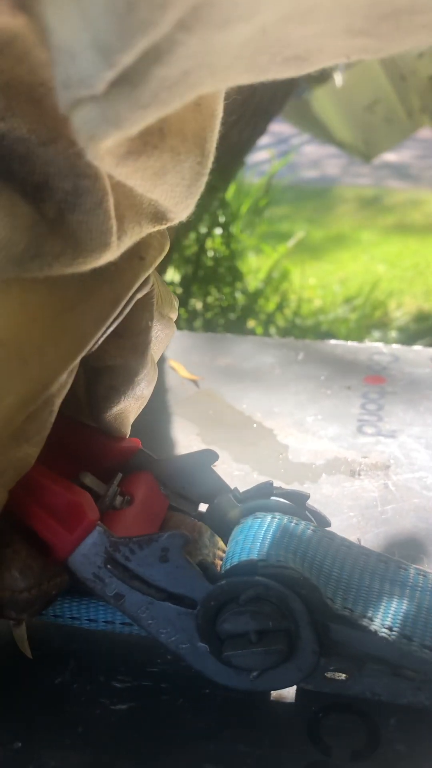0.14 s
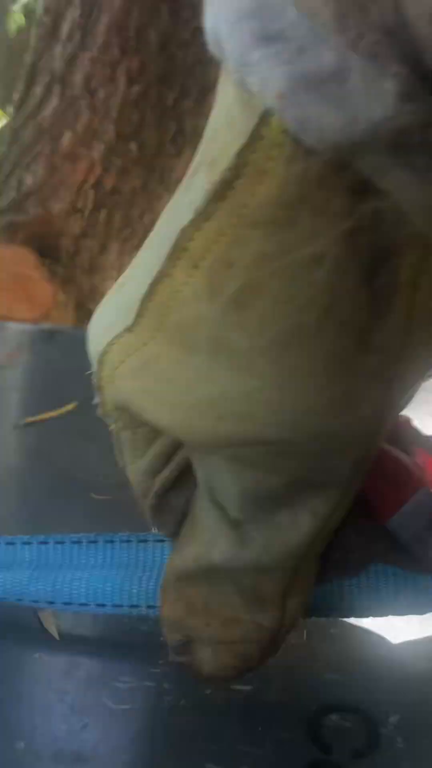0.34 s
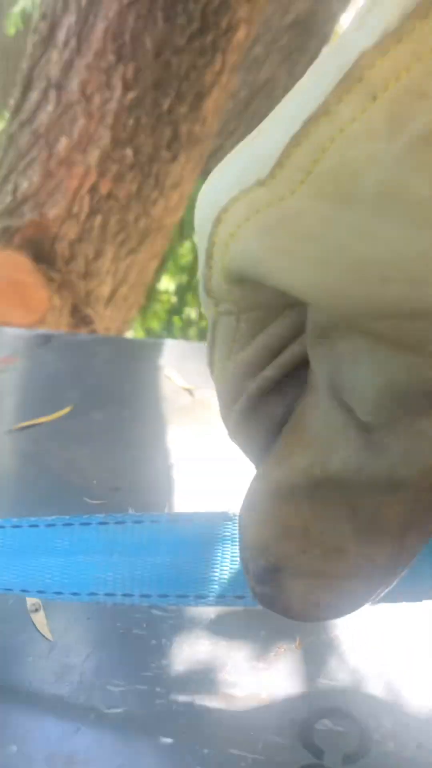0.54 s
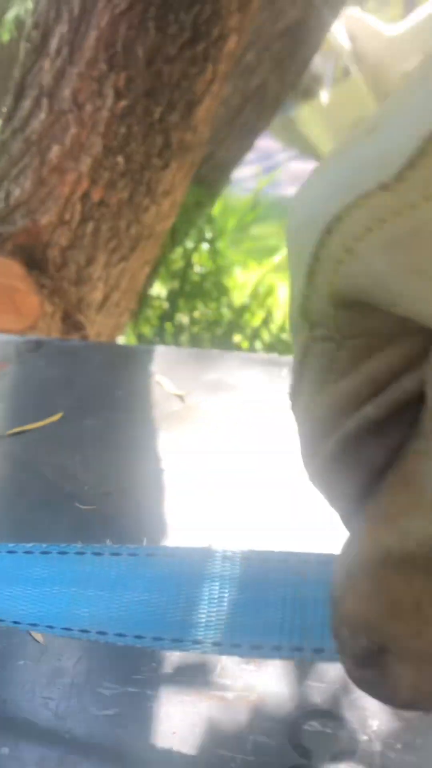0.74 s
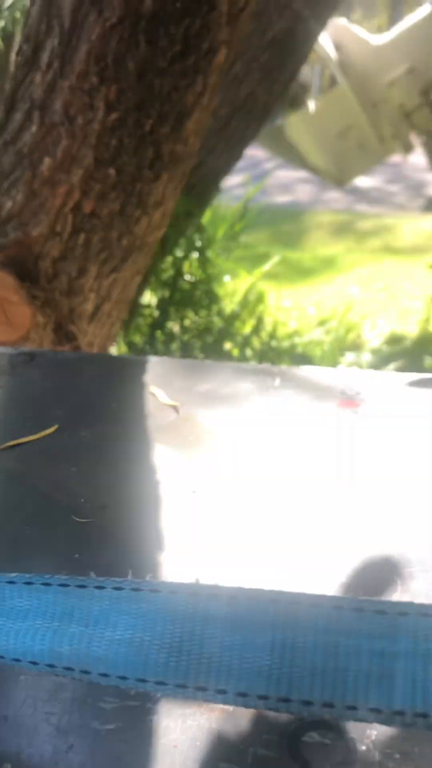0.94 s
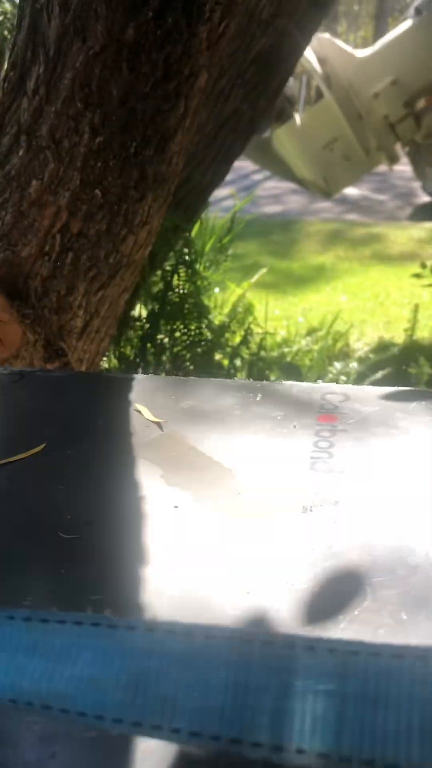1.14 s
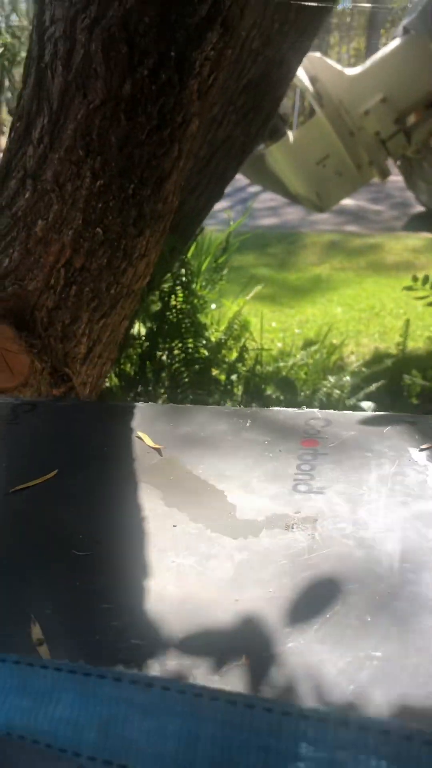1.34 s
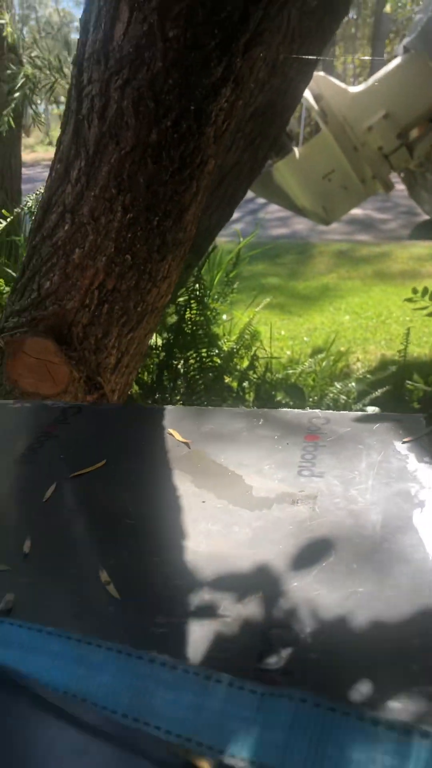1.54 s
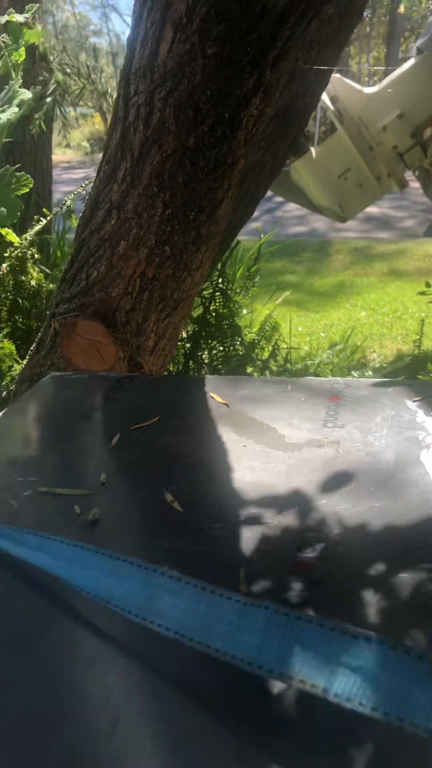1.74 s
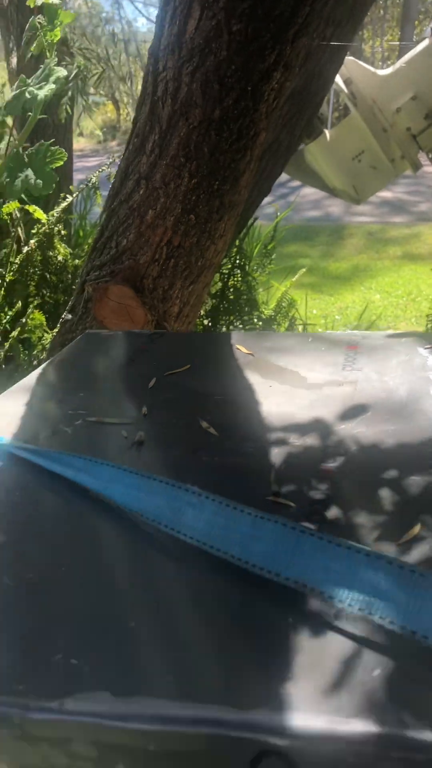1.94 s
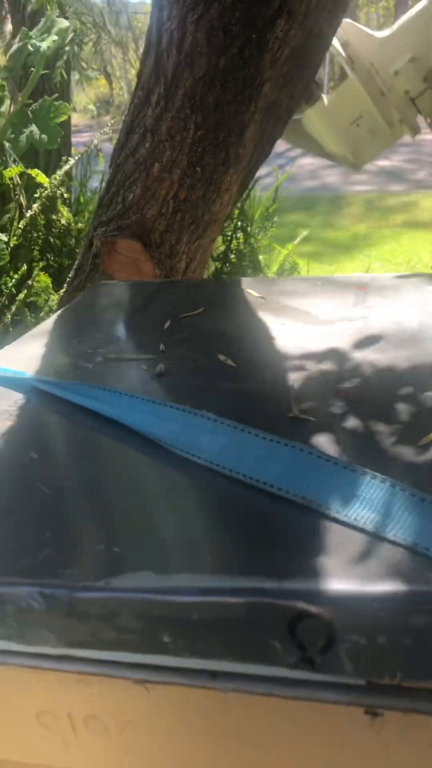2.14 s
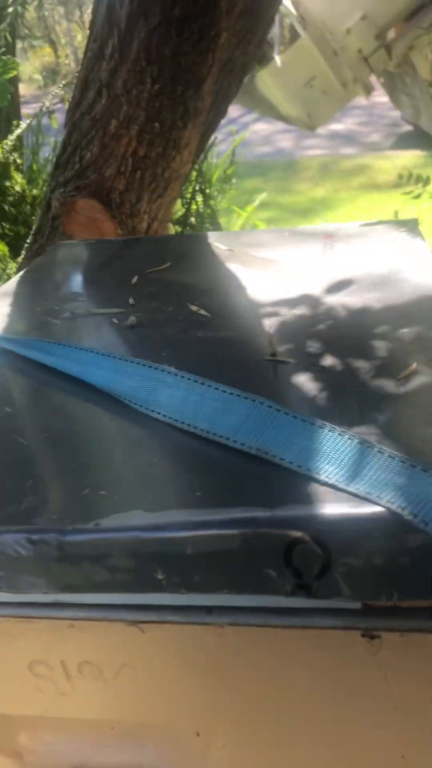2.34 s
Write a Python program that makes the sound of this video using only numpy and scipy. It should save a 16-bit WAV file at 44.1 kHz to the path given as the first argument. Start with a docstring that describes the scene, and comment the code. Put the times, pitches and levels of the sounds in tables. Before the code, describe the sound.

A metal ratchet strap buckle snaps open with a sharp double clack, faint birds whistling afterwards outdoors

```python
"""A steel ratchet buckle on a tight cargo strap is released outdoors, close to the microphone.
The spool spins free and rattles past its pawl, in bright noise snaps, mid-range clacks and steel ring.
The buckle slams onto the load's hollow panel: cracking noise and damped modes, with dull gliding thuds.
Shaped noise makes the glove and sleeve, which rustle away afterwards.
Birds, arched whistles with an octave, call in the trees over a low rumble of noise and faint hum."""
import sys
import numpy as np
from scipy import signal
from scipy.fft import rfft, irfft, next_fast_len
from scipy.io import wavfile
from scipy.ndimage import map_coordinates

SR = 44100
rng = np.random.default_rng(int(sys.argv[2]) if len(sys.argv) > 2 else 0)


def output_pcm(signal):
    """Save a mono or channel-first signal as 16-bit PCM at the path in sys.argv[1].

    Samples are clipped to [-1, 1] before scaling.
    """
    pcm = np.clip(np.atleast_2d(signal).T, -1, 1) * 32767
    wavfile.write(sys.argv[1], SR, np.round(pcm).astype(np.int16))


N = 105840
T = np.arange(N) / SR  # s


def amp(db):
    """Decibels to gain."""
    return 10 ** (np.asarray(db) / 20)


def unit(x):
    """Scale to rms 1."""
    return x / np.sqrt(np.mean(x ** 2) + 1e-20)


def along(points, hz):
    """Read a curve of (f/Hz, value) points on a log frequency axis."""
    f, v = np.transpose(points)
    return np.interp(np.log(hz + 1), np.log(f + 1), v)


def fade(t, t60):
    """Exponential decay by 60 dB in t60 seconds."""
    return np.exp(-np.log(1000) * t / t60)


def noise(colour, size=N):
    """Noise of rms 1, its spectrum shaped by (f/Hz, level/dB) points."""
    spectrum = rfft(rng.standard_normal(size))
    gain = amp(along(colour, np.fft.rfftfreq(size, 1 / SR)))
    return unit(irfft(spectrum * gain, size))


def wobble(rate):
    """A smooth random curve, rate knots a second."""
    knots = rng.standard_normal(4096)
    return map_coordinates(knots, [T * rate], mode="wrap")


def ring(modes, t, t60, scatter_db):
    """Damped modes, struck a little differently each time; t60 is a function of frequency."""
    out = np.zeros(len(t))
    for hz, db in modes:
        level = amp(db + scatter_db * rng.normal()) * fade(t, t60(hz))
        out += level * np.sin(2 * np.pi * (hz * t + rng.random()))
    return out


def add(out, s, x):
    """Mix x in at time s."""
    i = max(0, round(s * SR))
    out[i:i + len(x)] += x[:N - i]


def echo(x, t60):
    """Diffuse outdoor reflections: a decaying noise tail that builds up over some 15 ms."""
    t = T[:SR]
    tail = rng.standard_normal(SR) * fade(t, t60) * (1 - np.exp(-t / 0.015))
    return signal.fftconvolve(x, tail / np.linalg.norm(tail))[:N]


def ratchet():
    """Each contact is a bright snap, a mid-range clack, a faint chatter and a short steel ring."""
    # steel-on-steel contacts of pawl and spool: [t/s, relative level/dB, weight of frame's clack/dB]
    contacts = [(0.2022, -7.5, -10.5), (0.204, -7.5, -1.5), (.2052, -19, -2), (0.2114, -13.5, -22),
                (0.2104, -35, -11.5), (.2160, -29.5, -6), (0.2181, 0, -13.5), (0.2182, -11, -17),
                (0.2189, -17, -26.5), (.2233, -10, -12.5), (0.2294, -26.5, -3.5), (0.2317, -11.5, -4),
                (.2335, -22, 0), (0.2396, -8.5, -12), (0.2414, -28, -17), (0.2508, -28.5, -4),
                (0.2617, -20, -4.5), (0.2648, -15, -15), (0.2679, -16.5, -5.5), (0.2683, -16.5, -12),
                (0.272, -33.5, -18), (0.2815, -27.5, 4.5), (0.3192, -15.5, -2), (0.3599, -29.5, -10),
                (.3641, -35, 3), (.3690, -43, -17)]
    # ring of the buckle's steel: [f/Hz, relative level/dB]
    steel_modes = [(2250, -13), (4414, -18.5), (5255, -2.5), (6600, -7), (7796, -3), (8398, -5.5),
                   (8762, -6), (8864, -5), (9000, -4.5), (9250, -5), (9704, -0.5), (12050, 0), (13080, -4)]
    # spectrum of snap and chatter: [f/Hz, relative level/dB]
    snap_colour = [(300, -17), (3000, -19.5), (5200, -1), (7200, -8.5), (8800, 1.5), (10300, -5),
                   (13000, -1), (15500, -6)]
    # spectrum of the frame's clack: [f/Hz, relative level/dB]
    clack_colour = [(100, -19.5), (200, 6.5), (500, 0.5), (900, -1), (1550, -12.5), (2200, 1.5), (3100, -7),
                    (4600, -2), (6000, -4.5), (15000, -25)]
    snap_t60, chatter_t60, clack_t60, clack_tail_t60, steel_t60 = 0.0081, 0.083, 0.0095, 0.14, 0.09  # s
    snap_db, chatter_db, clack_tail_db, steel_db = 2, -24, -18, -30  # relative to the contact
    out, t = np.zeros(N), T[:SR // 4]
    for s, db, clack_db in contacts:
        snap_level = amp(snap_db) * fade(t, snap_t60) + amp(chatter_db) * fade(t, chatter_t60)
        snap = noise(snap_colour, size=len(t)) * snap_level
        clack_level = .5 * fade(t, clack_t60) + amp(clack_tail_db) * fade(t, clack_tail_t60)
        clack = amp(clack_db) * noise(clack_colour, size=len(t)) * clack_level
        steel = amp(steel_db) * ring(steel_modes, t, lambda hz: steel_t60, scatter_db=1.5)
        add(out, s, amp(db) * (snap + clack + steel))
    return out


def panel():
    """A blow cracks, dulls as its treble dies and rings the panel."""
    # blows of the buckle on the panel: [t/s, knock level/dB, panel ring level/dB]
    blows = [(.3143, -7.5, -27.5), (.3295, -25.5, -31.5)]
    # ring of the hollow panel: [f/Hz, relative level/dB]
    panel_modes = [(185, -8), (310, -6.5), (490, -2), (670, -0.5), (851, -10), (1000, 1), (1240, 2.5),
                   (1430, -22), (1663, -3), (1850, -13), (2065, 5), (2362, -3), (2530, 8.5)]
    # spectrum of a knock: [f/Hz, relative level/dB]
    knock_colour = [(60, -25), (150, 3), (300, -9.5), (700, -2.5), (1100, -4.5), (1650, -0.5), (2300, -1),
                    (3000, -2), (4500, -5), (5700, -11), (6850, -2.5), (8400, -19), (15500, -17)]
    # decay of a knock: [f/Hz, t60/s]
    knock_t60 = [(100, 0.099), (600, 0.19), (1500, 0.088), (3500, 0.053), (14000, 0.013)]
    crack_t60, crack_db = .008, 4  # s; dB over the body of the knock
    ring_t60, damping = .105, .6  # s at 1 kHz; power by which it shortens with frequency
    out, t = np.zeros(N), T[:SR // 2]
    for s, knock_db, ring_db in blows:
        hz, age, z = signal.stft(noise(knock_colour, size=len(t)), SR, nperseg=256)
        z = z * fade(age, along(knock_t60, hz)[:, None])
        knock = signal.istft(z, SR, nperseg=256)[1][:len(t)]
        knock *= .5 * (1 + amp(crack_db) * fade(t, crack_t60))
        modes = ring(panel_modes, t, lambda f: ring_t60 * (f / 1000) ** -damping, scatter_db=-0.5)
        modes *= 1 - np.exp(-t / 0.00086)  # soft onset
        add(out, s, amp(knock_db) * knock + amp(ring_db) * modes)
    return out


def thuds():
    """Soft low pushes of strap and hollow panel, whose pitch settles as the tension lets go."""
    # dull thuds: [t/s, level/dB, settled f/Hz, t60/s]
    pushes = [(0.202, -19.5, 180, 0.09), (0.22, -26.5, 79.2, 0.1), (0.248, -34, 276, 0.12),
              (0.269, -30.5, 226, 0.19), (0.3129, -18.5, 237, 0.065), (0.3277, -13, 121.2, 0.1),
              (0.424, -34.5, 207, 0.1)]
    rise_s, settle_s = 0.0054, .012
    sag = 0.11  # fraction by which the pitch starts high
    out, t = np.zeros(N), T[:SR // 2]
    for s, db, hz, t60 in pushes:
        pitch = hz * (1 + sag * np.exp(-t / settle_s))
        phase = 2 * np.pi * np.cumsum(pitch) / SR
        onset = 1 - np.exp(-(t / rise_s) ** 2)
        add(out, s, amp(db) * np.sin(phase) * fade(t, t60) * onset)
    return out


def handling():
    """Grainy rustle of the sleeve, soft brushes of the glove and a few small ticks, all as shaped noise."""
    # course of the sleeve's rustle, before its gain: [t/s, level/dB]
    rustle_course = [(0, -68), (.1, -75.5), (.45, -61), (0.528, -69.5), (.62, -64.5), (1.1, -63.5),
                     (1.17, -71.5), (1.262, -58), (1.3, -67), (1.38, -65.5), (1.48, -75), (1.63, -67.5),
                     (1.72, -79.5), (1.84, -71.5), (1.994, -55.5), (2.2, -64), (2.344, -57.5), (2.4, -58.5)]
    # spectrum of the rustle: [f/Hz, relative level/dB]
    rustle_colour = [(300, -16.5), (1000, -7.5), (2500, 2.5), (4500, 5.5), (8000, 0.5), (12000, -1.5),
                     (15500, -5)]
    # brushes of the glove: [centre t/s, length/s, level/dB]
    brushes = [(0.06, 0.204, -58), (1.26, 0.047, -52.5), (2.06, 0.37, -55), (2.356, 0.155, -59)]
    # spectrum of a brush: [f/Hz, relative level/dB]
    brush_colour = [(300, -20), (1400, 6), (2400, 4), (4000, -7.5), (15000, -22)]
    # small handling ticks: [t/s, level/dB, centre f/Hz]
    ticks = [(0.032, -46.5, 4030), (0.061, -51, 4140), (0.126, -52, 4730), (.172, -52.5, 4500),
             (.180, -43.5, 4960), (.2897, -31.5, 2500), (0.3011, -29.5, 3500), (.580, -43.5, 3010),
             (1.869, -44.5, 11000), (1.926, -39, 12000), (2.1471, -35, 1070), (2.1525, -43.5, 9100)]
    rustle_db = 4.5  # gain on the whole course
    s, db = np.transpose(rustle_course)
    grain_db = 1.4 * wobble(40) + 2.1 * wobble(760)
    out = amp(np.interp(T, s, db) + rustle_db + grain_db) * noise(rustle_colour)
    strokes = sum(amp(db) * np.exp(-(2 * (T - s) / length) ** 2) for s, length, db in brushes)
    out += strokes * amp(2.275 * wobble(300)) * noise(brush_colour)
    t = T[:SR // 20]
    for s, db, hz in ticks:
        colour = [(hz / 4, -14), (hz, 0), (hz * 2, -11), (hz * 10, -35)]
        add(out, s, amp(db) * fade(t, 0.013) * noise(colour, size=len(t)))
    return out


def birds():
    """Arched whistles with a strong octave, clear on top and raspy on the slopes, smeared by the trees."""
    # bird calls: [start t/s, length/s, top f/Hz, opening rise 0-1, closing fall 0-1, level/dB, octave/dB]
    calls = [(1.662, 0.04, 2183, 0.11, 0.42, -61, -8), (1.691, 0.05, 2608, .06, 0.05, -60.5, -9),
             (1.746, 0.065, 2494, 0.01, 0.1, -60, -10), (1.796, 0.015, 2086, .08, 0, -52.5, -8),
             (1.806, .125, 3236, 0.36, 0.42, -53, -2.5), (2.094, .115, 3232, 0.3, 0.36, -54, -2),
             (2.153, 0.12, 2476, 0, 0, -63.5, 6.5), (2.186, 0.0274, 2746, 0.11, 0.17, -59, 5.5),
             (2.237, 0.024, 2850, 0.4, 0.04, -68, 8), (2.247, .1, 3051, 0.2, 0, -57, -4),
             (2.355, 0.036, 2694, 0.12, 0.07, -59, 3.5)]
    arch_power = 2.6  # higher keeps the top of the arch flatter
    waver, waver_per_s = 0.0072, 245  # pitch fraction; knots a second
    rasp = 0.11  # pitch scatter per unit of bend: the call roughens on its slopes
    trees_t60, trees_db = 0.99, -1.5  # s, dB
    out = np.zeros(N)
    for s, length, hz, rise, fall, db, octave_db in calls:
        u = np.linspace(-1, 1, int(length * SR))
        n = len(u)
        bend = np.where(u < 0, rise, fall) * np.abs(u) ** arch_power
        scatter = waver * wobble(waver_per_s)[:n] + rasp * bend * wobble(1400)[:n]
        pitch = hz * (1 - bend + scatter)
        phase = 2 * np.pi * np.cumsum(pitch) / SR
        for k, gain in ((1, 0.86), (2, amp(octave_db))):
            level = amp(db + 4 * wobble(130)[:n]) * signal.windows.tukey(n, .25)
            add(out, s, gain * level * np.sin(k * phase))
    return out + amp(trees_db) * echo(out, trees_t60)


def air():
    """Low outdoor rumble of noise with a faint, steady hum and one soft mid-range swell."""
    # spectrum of the rumble: [f/Hz, relative level/dB]
    rumble_colour = [(20, -46), (32, -35.5), (42, -13.5), (54, -6), (75, -2.5), (120, 0), (170, -2.5),
                     (240, -9.5), (380, -9), (480, -8), (640, -14.5), (1270, -18), (2400, -24), (5600, -35),
                     (15500, -48.5)]
    # spectrum of the swell: [f/Hz, relative level/dB]
    swell_colour = [(100, -14.5), (330, -5), (480, 4), (650, -10), (1200, -18), (4000, -41.5)]
    rumble_db, rumble_waver_db = -52.5, .6
    hum_hz, hum_db = 55, -58.5
    swell_s, swell_length_s, swell_db = 0.87, .9, -56  # centre, length, peak level
    rumble = amp(rumble_db + rumble_waver_db * wobble(15)) * noise(rumble_colour)
    # level in rms; the phase drifts slightly
    hum = amp(hum_db) * np.sqrt(2) * np.sin(2 * np.pi * hum_hz * T + .5 * wobble(4))
    swell_shape = np.exp(-(2 * (T - swell_s) / swell_length_s) ** 2)
    swell = amp(swell_db) * swell_shape * noise(swell_colour)
    return rumble + hum + swell


def scene():
    """The near buckle, almost dry, in the open yard, with handling, birds and air around it."""
    yard_t60, yard_db = .45, -28.5  # s, dB
    buckle = ratchet() + panel() + thuds()
    yard = amp(yard_db) * echo(buckle, yard_t60)
    return (buckle + yard + handling() + birds() + air())[None]


def record(dry):
    """The recorder drops the deepest bass, rounds off the highest peaks and cuts the top band."""
    low_cut_hz, ceiling, top_hz = 42, .7, 15800  # ceiling is in full-scale units
    dry = signal.sosfilt(signal.butter(3, low_cut_hz, "high", fs=SR, output="sos"), dry)
    held = dry / (1 + np.abs(dry / ceiling) ** 4) ** (1 / 4)
    m = next_fast_len(N + 8192)
    # the edge of the top band slopes over 300 Hz
    passband = np.clip((top_hz - np.fft.rfftfreq(m, 1 / SR)) / 300 + .5, 0, 1)
    return irfft(rfft(held, m) * passband, m)[:, :N]


dry = scene()
out = record(dry)
output_pcm(out)
```